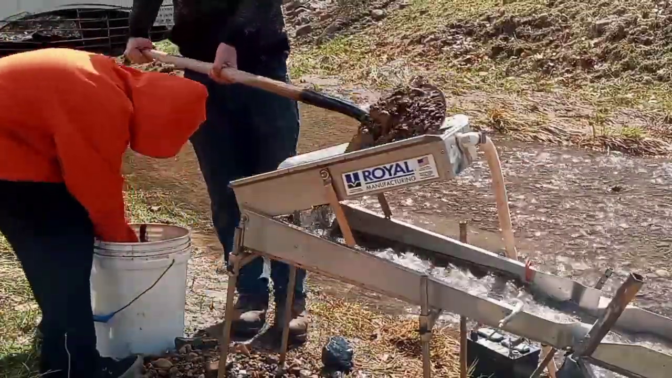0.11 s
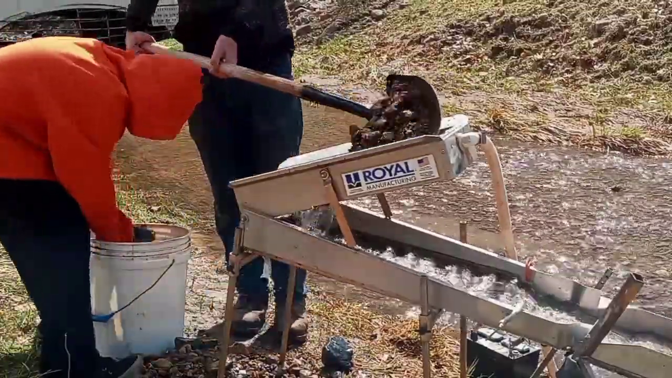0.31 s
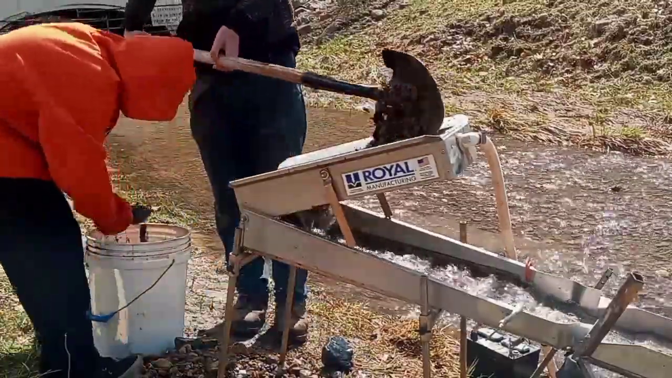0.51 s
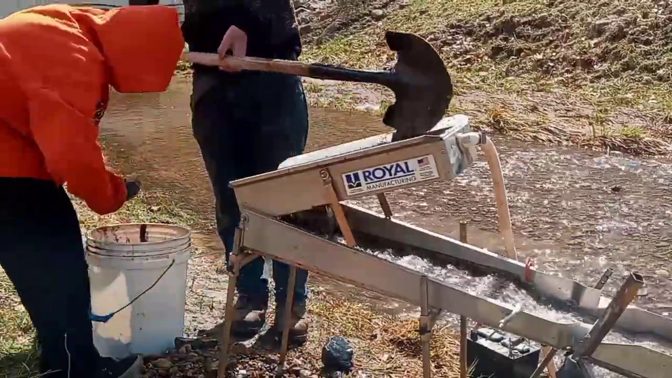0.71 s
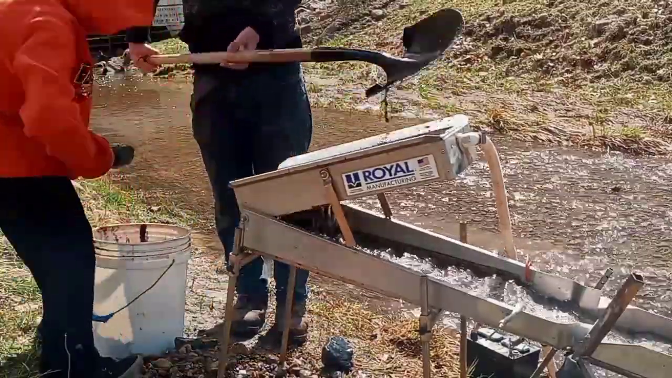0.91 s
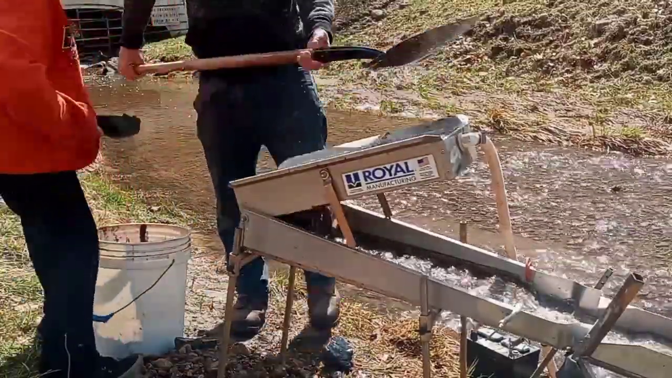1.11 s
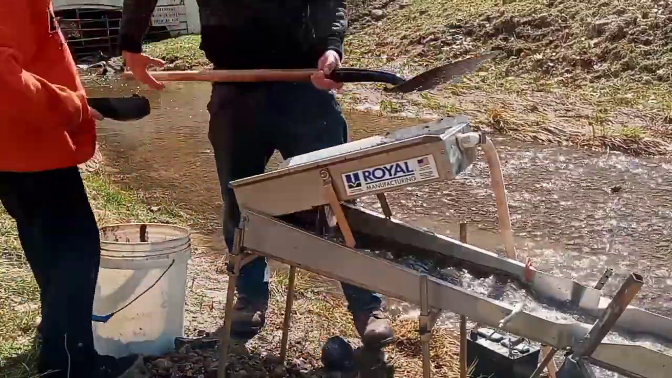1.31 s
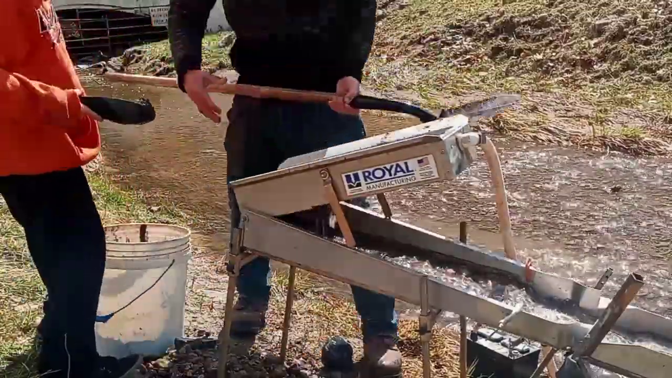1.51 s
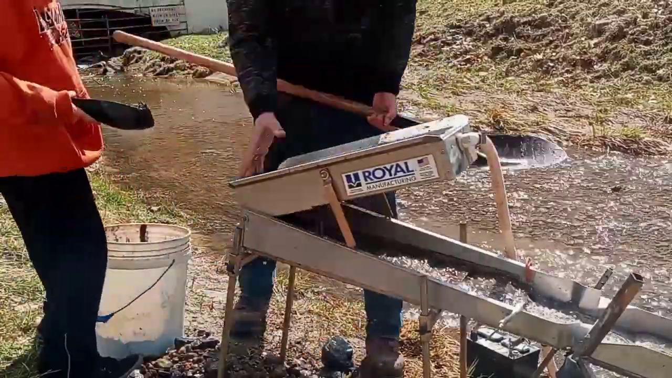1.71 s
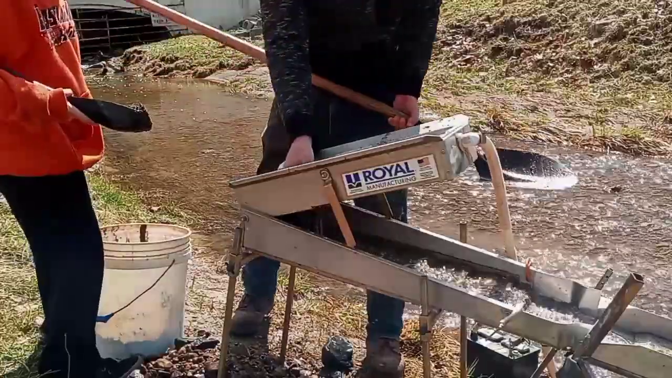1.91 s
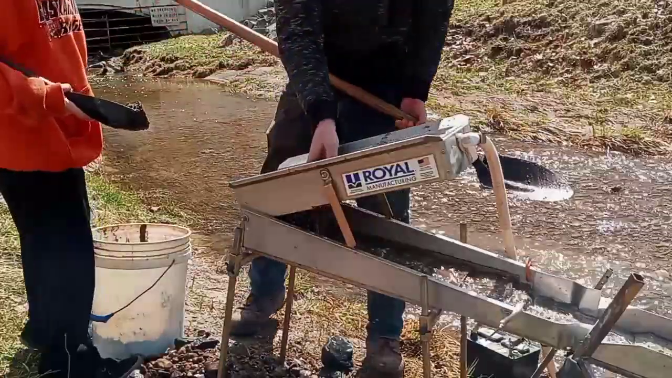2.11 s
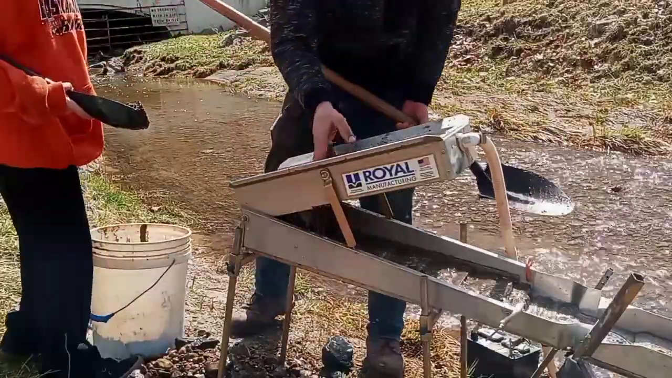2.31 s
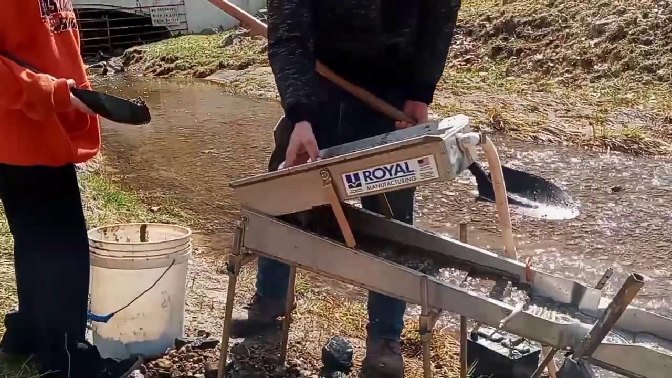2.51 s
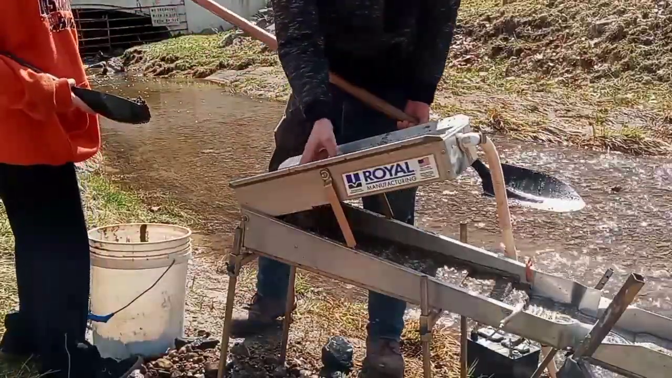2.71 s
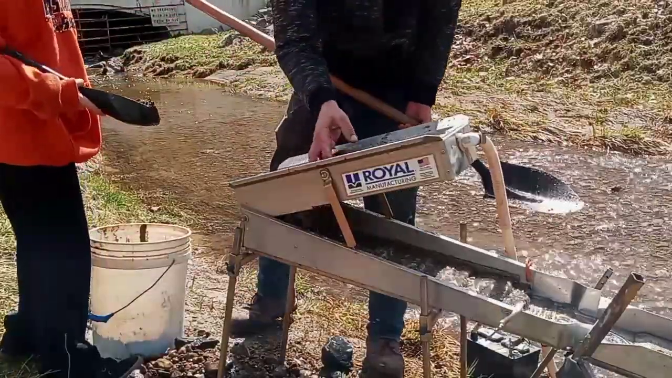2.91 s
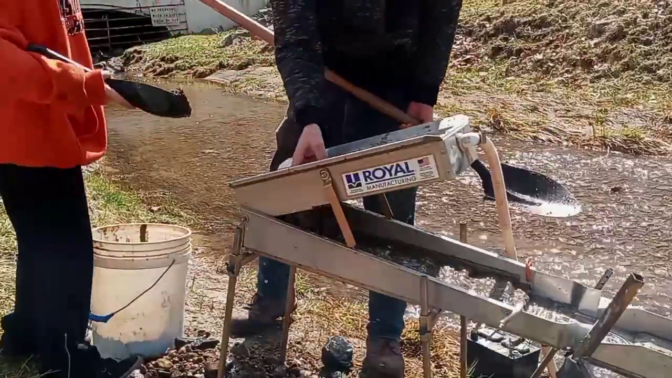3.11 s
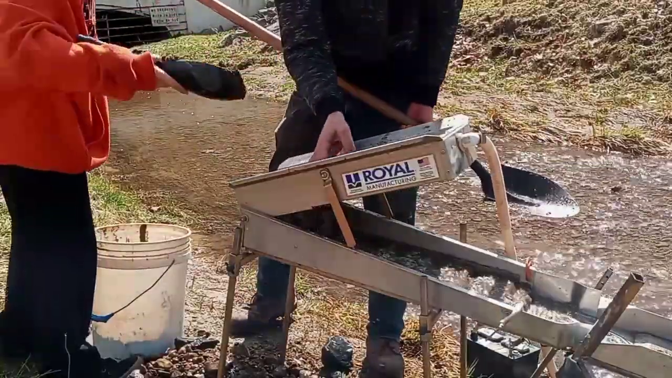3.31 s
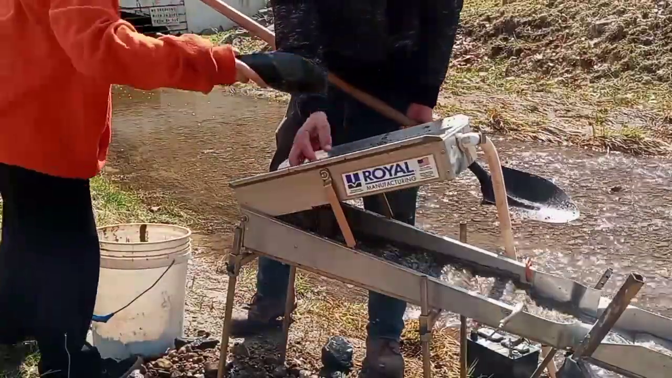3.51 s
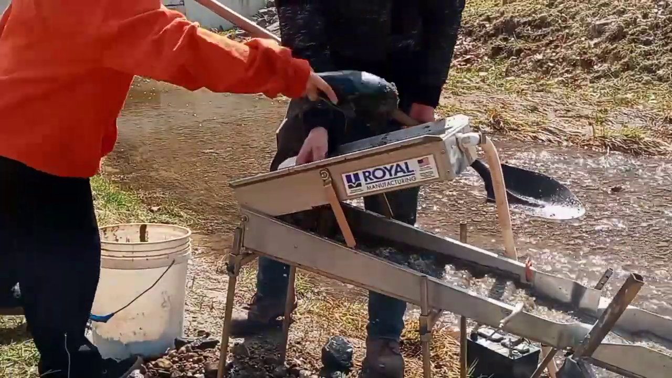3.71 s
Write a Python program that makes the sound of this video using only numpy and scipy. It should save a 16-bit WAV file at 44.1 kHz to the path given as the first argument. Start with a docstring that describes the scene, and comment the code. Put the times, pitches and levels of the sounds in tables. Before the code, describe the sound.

A shovelful of wet gravel slides into a metal hopper with hollow knocks and gritty hiss, thins out, then is raked in smaller tumbles; water rushes constantly. Close, dry outdoor mono pickup.

```python
"""Wet gravel in a sluice box

A shovelful of wet gravel slides into a metal hopper; later a hand rakes it down the tray and more stones tumble.
Water rushes, bubbles and spits throughout: filtered noise, damped chirps and very high ticks.
Gravel is random impulses ringing the tray's modes, and sand is bright ticks under a crunchy gain.
Large stones are paired noisy knocks with a sheet-metal boom; pebbles are short filtered snaps."""
import sys
import numpy as np
from scipy import signal
from scipy.fft import rfft, irfft, next_fast_len
from scipy.io import wavfile
from scipy.ndimage import map_coordinates

SR = 44100
rng = np.random.default_rng(int(sys.argv[2]) if len(sys.argv) > 2 else 0)


def digitize_waveform(pressure):
    """Quantize a signal to 16-bit integers and store it at the path in sys.argv[1].

    Rows of a 2-D input are taken as channels; values are limited to [-1, 1].
    """
    field = np.atleast_2d(pressure).T
    bounded = np.clip(field, -1, 1)
    quanta = np.round(bounded * 32767).astype(np.int16)
    wavfile.write(sys.argv[1], SR, quanta)


N = 165375
T = np.arange(N) / SR
AGE = T[:SR // 5]  # seconds since an event began

# Water spectrum. Each row: frequency in Hz, relative density in dB per Hz.
WATER_SPECTRUM = [(30, -65), (70, -46), (130, -16), (240, -11), (370, 2), (550, -1), (900, -3),
                  (1800, -6.5), (3400, -6), (5000, -14.5), (7000, -24), (9000, -26.5), (12000, -20),
                  (15500, -17)]
# Droplets spitting off the riffles. Each row: time in seconds, level in dB relative to SPRAY_DB.
SPRAY_LEVEL = [(0, -3), (.9, -9), (1.5, -6), (1.9, -4.5), (2.6, -7.5), (3.2, -7), (3.75, -18)]
# Pebbles clicking together. Each row: start in seconds, peak level in dB, pitch in Hz.
PEBBLE_CLICKS = [(0.059, -22.5, 3450), (1.424, -23, 2640), (1.431, -22.5, 3260), (1.5, -25.5, 3630),
                 (1.585, -21.5, 3080), (1.691, -22.5, 2650), (1.866, -21, 3250), (1.923, -23, 2700),
                 (2.53, -14.5, 2680), (2.779, -21.5, 3100), (3.296, -22.5, 3400)]
# Spectrum of a click. Each row: frequency as a multiple of the pebble's pitch, relative gain in dB.
PEBBLE_SPECTRUM = [(.01, -69), (.4, -53), (.7, 4.5), (1.5, -1.5), (2.1, -19.5), (3, -21)]
# Sand hissing off the shovel blade. Each row: time in seconds, level in dB.
SAND_LEVEL = [(.3, -53), (.335, -45), (.35, -32), (.37, -21), (.405, -36), (.43, -28.5), (.485, -36),
              (.54, -32.5), (.65, -35.5), (.8, -37), (1.0, -45.5), (1.1, -43)]
# Clumps of grit landing. Each row: start in seconds, level at the top of the swell in dB.
GRIT_CLUMPS = [(0.208, -26), (0.303, -24), (0.322, -26), (0.34, -24), (0.42, -30), (0.654, -29.5),
               (0.942, -35), (2.115, -35), (2.682, -35.5), (3.051, -38), (3.456, -39)]
# Grit spectrum. Each row: frequency in Hz, relative density in dB per Hz.
GRIT_SPECTRUM = [(100, -54), (600, -54), (1300, 4), (3000, 11), (6000, -2), (9000, -4), (12000, -1),
                 (15500, 3)]
# Gravel pouring onto the tray. Each row: time in seconds, level in dB.
POUR_LEVEL = [(.29, -49), (.31, -30.5), (.36, -25.5), (.44, -26), (.49, -24), (.56, -23), (.64, -27),
              (.72, -28), (.8, -30), (.95, -34.5), (1.2, -42.5)]
# Gravel raked down the tray by hand. Each row: time in seconds, level in dB.
RAKE_LEVEL = [(1.85, -52), (2.01, -35), (2.07, -39.5), (2.11, -30.5), (2.28, -30.5), (2.35, -36.5),
              (2.55, -36.5), (2.63, -33), (2.72, -35), (2.86, -31), (3.03, -41), (3.22, -43.5), (3.35, -36),
              (3.43, -38), (3.48, -34), (3.56, -46)]
# Gravel spectrum. Each row: frequency in Hz, relative density in dB per Hz.
GRAVEL_SPECTRUM = [(30, -47), (80, -39), (150, -27.5), (260, -20), (380, -4), (520, -0.5), (740, -8),
                   (1200, 1), (1550, -2), (2100, -7.5), (3500, -9), (5500, -16), (8000, -29.5),
                   (15000, -20.5)]
# Ringing modes of the tray. Each row: frequency in Hz, relative level in dB, t60 in seconds.
TRAY_MODES = [(342.5, -7.5, 0.058), (383, -8.5, 0.099), (426.5, -7.5, 0.081), (580, -6.5, 0.02),
              (787, -3.5, 0.065), (882.6, 0.5, 0.053), (1173, 3, 0.023), (1277, -11, 0.027),
              (1338, -12, 0.034), (1560, -3.5, 0.027), (1717, -7, 0.041), (2136, -7.5, 0.042),
              (2868, -9.5, 0.02)]
# Large stones hitting the tray. Each row: start in seconds, knock level in dB, floor boom level in dB,
# time spent tumbling to the second contact in seconds, nominal strongest pitch in Hz.
STONE_HITS = [(0.212, -24, -48, .005, 1120), (.221, -25, -18.5, 0.014, 453),
              (0.321, -28, -20.5, 0.0071, 1170), (.388, -9.5, -9.5, .008, 1640),
              (0.425, -16, -47, .003, 1090), (.455, -20, -34, .005, 1420), (.465, -10.5, -16, 0.00375, 870),
              (0.502, -40, -24, .004, 1110), (0.516, -19, -29, 0.0035, 1650), (0.548, -19, -23, .003, 1310),
              (0.565, -18, -16, .007, 1520), (0.605, -14.5, -16, 0.0021, 1190),
              (0.622, -17.5, -30, .008, 1066), (0.657, -18.5, -13.5, 0.003, 1130),
              (0.691, -25, -40, .016, 1500), (0.727, -17.5, -37, 0.00287, 935),
              (0.748, -26, -26, 0.0087, 1200), (0.853, -26, -50, .004, 1150),
              (0.876, -22, -48, 0.00352, 910), (1.081, -22, -34, 0.003, 1270),
              (2.096, -23, -54, .004, 1290), (2.117, -25, -48, .005, 1380), (2.211, -22.5, -36, .004, 1110),
              (2.245, -29, -24.5, 0.0025, 1070), (2.265, -23, -24.5, 0.01, 1105),
              (2.311, -24, -39, .006, 895), (2.384, -24, -21, 0.0037, 480),
              (2.746, -23, -45, 0.00206, 1410), (2.862, -21.5, -23, 0.0045, 633),
              (2.872, -19, -33, 0.0028, 1090), (2.937, -26.5, -30, .005, 830),
              (2.954, -19.5, -27, 0.0038, 1190), (2.995, -26, -48, 0.0023, 900),
              (3.09, -24, -27, 0.0019, 1550), (3.408, -13, -22, .0045, 894),
              (3.468, -23.5, -30, 0.0067, 1280), (3.712, -30, -29, .004, 630)]
# Filter for a stone's thud. Each row: frequency in Hz, relative gain in dB.
KNOCK_SPECTRUM = [(30, -41), (90, -48), (170, -23), (250, -12), (360, -4), (600, 2), (900, -2), (1750, -1),
                  (2400, -3.5), (3500, -21.5), (5500, -21), (12000, -50)]

WATER_DB, BUBBLE_DB = -38.5, -41.5  # levels midway through
WATER_RISE_DB_PER_S = 0.03  # the water grows very slightly louder
SPRAY_DB = -45.5  # reference for the spray's level curve
PEBBLE_SCUFF, PEBBLE_T60_S = .3, .009  # scuffing noise beside the snap
RAKE_SAND_DB = -10.5  # sand stirred by the hand, relative to the gravel
CLUMP_RISE_S, CLUMP_T60_S = 0.0058, 0.042
GRAVEL_PER_S, GRAVEL_SPREAD_DB = 1100, 3  # hits over all spots of the tray, unevenness of their size
GRAVEL_T60_S, GRAVEL_RING_DB = 0.013, -15.5  # dry burst of a hit, tray ring under it
RATTLE_DB = -8  # stone on stone, relative to the patter
THUD_T60_S, THUD_RING_DB = .014, -16
STONE_PITCH_DB, STONE_T60_S = -0.5, .024  # a stone's strongest pitch beside the thud
SECOND_EDGE_DB = -3  # the second contact relative to the first
KNOCK_SPAN_S = 0.0017  # a knock's energy is levelled as if it lasted this long
FLOOR_HZ, FLOOR_SAG = 420.8, 0.19  # boom before sagging, fraction of sag per unit of knock gain
FLOOR_T60_S, BOOM_RISE_S = 0.091, 0.0041
FLOOR_PAIR, FLOOR_PAIR_DB = .9, -6  # lower mode stirred by the second contact: pitch ratio, relative level
# the bulk of the load lands and shakes the whole hopper
THUMP_S, THUMP_DB, THUMP_HZ, THUMP_T60_S = .39, -34.5, 175, 0.13
TOP_HZ = 15600


def amp(db):
    """Decibels to gain."""
    return 10 ** (np.asarray(db) / 20)


def unit(x):
    """Scale to rms 1."""
    return x / np.sqrt(np.mean(x ** 2) + 1e-20)


def fade(t60):
    """An exponential decay that falls 60 dB in t60 seconds."""
    return np.exp(-np.log(1000) * AGE / t60)


def level(rows):
    """Gain per sample drawn through (seconds, dB) points, practically silent outside them."""
    s, db = np.transpose(rows)
    return amp(np.interp(T, s, db, left=-120, right=-120))


def add(track, s, sound):
    """Mix a sound into the track at a time in seconds."""
    i = max(0, round(s * SR))
    track[i:i + len(sound)] += sound[:max(0, N - i)]


def colour(x, points):
    """A causal minimum-phase filter of unit energy, shaped by (Hz, dB) points."""
    size = 8192
    hz, db = np.transpose(points)
    log_hz = np.log(np.fft.rfftfreq(size, 1 / SR) + 1)
    log_gain = np.log(amp(np.interp(log_hz, np.log(hz), db)))
    # folding the cepstrum forward in time makes the filter causal
    cepstrum = irfft(log_gain)
    cepstrum[1:size // 2] *= 2
    cepstrum[size // 2 + 1:] = 0
    response = irfft(np.exp(rfft(cepstrum)))
    return signal.fftconvolve(x, response / np.linalg.norm(response))[:len(x)]


def wobble(rate):
    """A smooth random curve, rate knots a second."""
    return map_coordinates(rng.standard_normal(2000), [T * rate], mode="wrap")


def ticks(rate, spread_db):
    """Random impulses, rate a second on average, of uneven size and either sign."""
    size = amp(spread_db * np.clip(rng.standard_normal(N), -2, 2))
    struck = rng.random(N) < rate / SR
    return unit(struck * size * rng.choice([-1, 1], N))


def grains(count, centre_hz, octaves, cycles, spread_db, rise):
    """Bubbles, drops or stone chips: damped tones that may rise in pitch; a few are louder than the rest."""
    u = rng.random((count, 5))
    hz = centre_hz * 2 ** (octaves * (u[:, :1] + u[:, 1:2] - 1))
    t = AGE[:1400]
    age = t * hz / (cycles * (.5 + u[:, 2:3]))  # higher grains age faster
    tone = np.sin(2 * np.pi * hz * t * (1 + rise * np.minimum(age, 2)))
    tone = tone * np.exp(-3 * age) * (1 - np.exp(-t * hz))
    size = amp(spread_db * u[:, 3:4] ** 4) * np.sqrt(hz / centre_hz)
    at = (u[:, 4:] * N).astype(int) + np.arange(len(t))
    return unit(np.bincount(at.ravel(), (tone * size).ravel(), N)[:N])


def tray(t60, ring_db):
    """One spot of the tray: a dry noise burst, and modes whose strengths and signs depend on the spot."""
    weights = amp(rng.normal(0, 0.9, len(TRAY_MODES))) * rng.choice([-1, 1], len(TRAY_MODES))
    ring = np.zeros(len(AGE))
    for weight, (hz, db, life) in zip(weights, TRAY_MODES):
        ring += weight * amp(db + ring_db) * fade(life) * np.sin(2 * np.pi * hz * AGE)
    return rng.standard_normal(len(AGE)) * fade(t60) + ring


def boom(hz, db, t60):
    """One low mode of the sheet metal, with a soft start."""
    return amp(db) * np.sin(2 * np.pi * hz * AGE) * fade(t60) * (1 - np.exp(-AGE / BOOM_RISE_S))


def water():
    """The rush over the riffles, churning unevenly, full of small bubbles that rise in pitch."""
    churn = amp(1.6 * wobble(50) + .4 * wobble(5))
    source = rng.standard_normal(N) + ticks(2500, 5.4)
    rush = unit(colour(source, WATER_SPECTRUM) * churn)
    froth = grains(count=2200, centre_hz=1300, octaves=1.8, cycles=9, spread_db=11, rise=0.06)
    swell = amp(WATER_RISE_DB_PER_S * (T - T.mean()))
    return swell * (amp(WATER_DB) * rush + amp(BUBBLE_DB) * froth)


def spray():
    """Tiny droplets burst with very high ticks."""
    drops = grains(count=800, centre_hz=12800, octaves=.22, cycles=8, spread_db=14, rise=0)
    highpass = signal.butter(4, 10500, "highpass", fs=SR, output="sos")
    return amp(SPRAY_DB) * level(SPRAY_LEVEL) * unit(signal.sosfilt(highpass, drops))


def pebbles():
    """Stone on stone: a short bright snap with a little scuffing."""
    out = np.zeros(N)
    for s, db, hz in PEBBLE_CLICKS:
        scuff = PEBBLE_SCUFF * rng.standard_normal(len(AGE)) * fade(PEBBLE_T60_S)
        contact = (AGE == 0) + scuff
        spectrum = [(hz * multiple, gain_db) for multiple, gain_db in PEBBLE_SPECTRUM]
        click = colour(contact, spectrum)
        add(out, s, amp(db) * click / np.abs(click).max())
    return out


def sand():
    """Fine grit slides over the metal and lands in clumps: dense ticks with a fast uneven crunch."""
    flow = level(SAND_LEVEL) + amp(RAKE_SAND_DB) * level(RAKE_LEVEL)
    shape = (1 - np.exp(-AGE / CLUMP_RISE_S)) * fade(CLUMP_T60_S)
    for s, db in GRIT_CLUMPS:
        add(flow, s, amp(db) * shape / shape.max())
    crunch = amp(3.5 * np.tanh(wobble(160)))
    return flow * unit(colour(ticks(9000, 3.0), GRIT_SPECTRUM) * crunch)


def gravel(count=14):
    """Many small stones patter on several spots of the tray and rattle against each other."""
    patter = np.zeros(N)
    for _ in range(count):
        hits = ticks(GRAVEL_PER_S / count, GRAVEL_SPREAD_DB)
        patter += signal.fftconvolve(hits, tray(GRAVEL_T60_S, GRAVEL_RING_DB))[:N]
    rattle = grains(count=1500, centre_hz=1900, octaves=1.1, cycles=6, spread_db=10, rise=0)
    moving = colour(unit(patter) + amp(RATTLE_DB) * rattle, GRAVEL_SPECTRUM)
    return unit(moving) * (level(POUR_LEVEL) + level(RAKE_LEVEL))


def knock(pitch_hz):
    """One contact of a stone: a filtered thud of the tray plus a damped tone near the stone's pitch."""
    thud = colour(tray(THUD_T60_S, THUD_RING_DB), KNOCK_SPECTRUM)
    hz = pitch_hz * (1 + 0.046 * rng.standard_normal())
    body = np.sin(2 * np.pi * hz * AGE) * fade(STONE_T60_S) * (1 - np.exp(-AGE * pitch_hz))
    sound = unit(thud) + amp(STONE_PITCH_DB) * rng.choice([-1, 1]) * unit(body)
    return sound / np.sqrt(np.sum(sound ** 2) / (KNOCK_SPAN_S * SR))


def stones():
    """Each large stone lands, tips onto a second edge and booms the floor; heavy ones pull its pitch down."""
    out = np.zeros(N)
    for s, db, boom_db, tumble, pitch_hz in STONE_HITS:
        add(out, s, amp(db) * knock(pitch_hz))
        add(out, s + tumble, amp(db + SECOND_EDGE_DB) * knock(pitch_hz))
        # the knock's gain stands for the stone's weight
        hz = FLOOR_HZ * (1 - FLOOR_SAG * amp(db) + 0.019 * rng.standard_normal())
        add(out, s, boom(hz, boom_db, FLOOR_T60_S))
        lower = boom(hz * FLOOR_PAIR, boom_db + FLOOR_PAIR_DB, FLOOR_T60_S)
        add(out, s + tumble, rng.choice([-1, 1]) * lower)
    add(out, THUMP_S, boom(THUMP_HZ, THUMP_DB, THUMP_T60_S))
    return out


def scene():
    """All sources summed in the open air, without reverberation, as one channel."""
    return (water() + spray() + pebbles() + sand() + gravel() + stones())[None]


def record(dry):
    """A steep band limit: nothing above TOP_HZ passes."""
    size = next_fast_len(N + SR // 2)
    passed = np.fft.rfftfreq(size, 1 / SR) < TOP_HZ
    return irfft(rfft(dry, size) * passed, size)[..., :N]


dry = scene()
out = record(dry)
digitize_waveform(out)
```